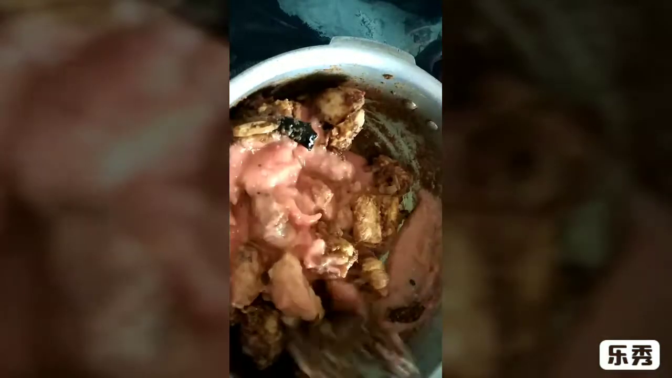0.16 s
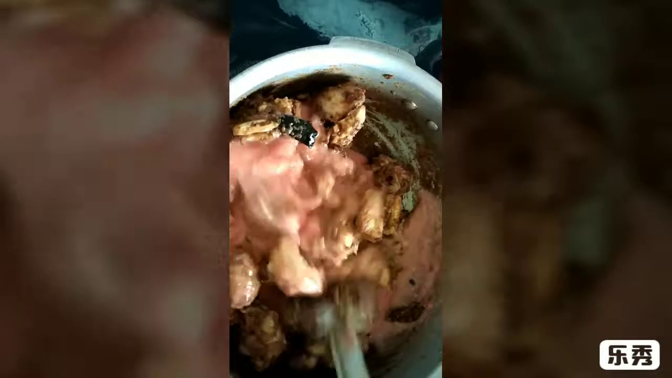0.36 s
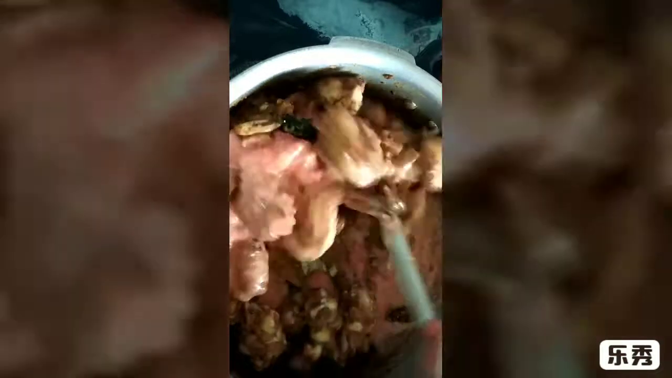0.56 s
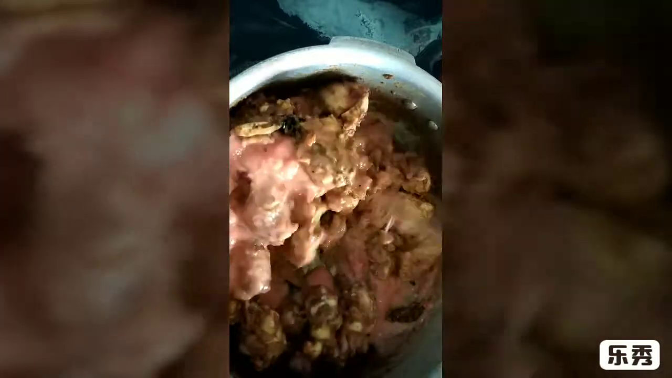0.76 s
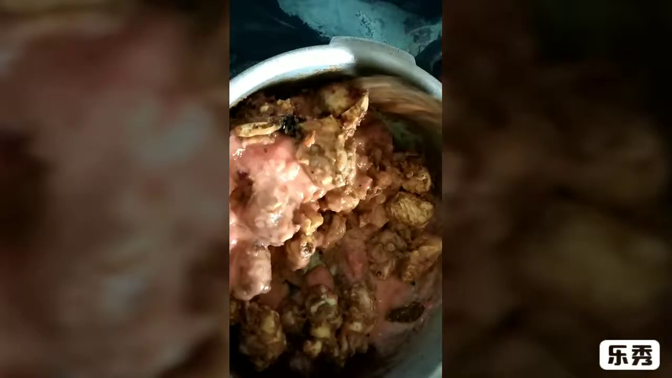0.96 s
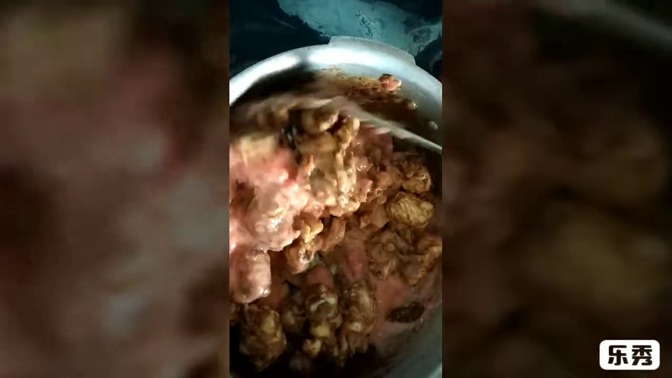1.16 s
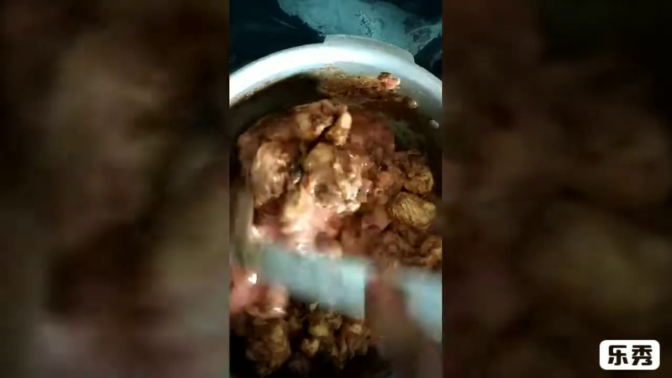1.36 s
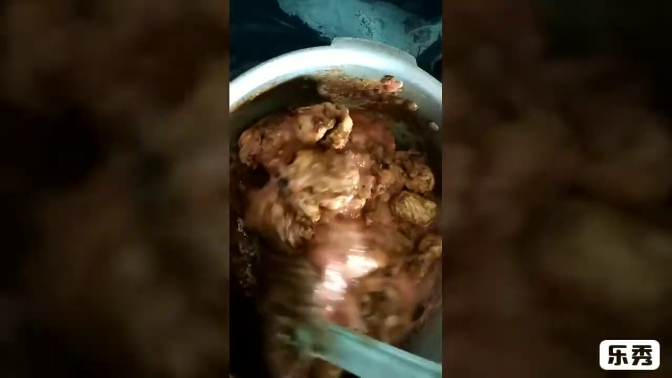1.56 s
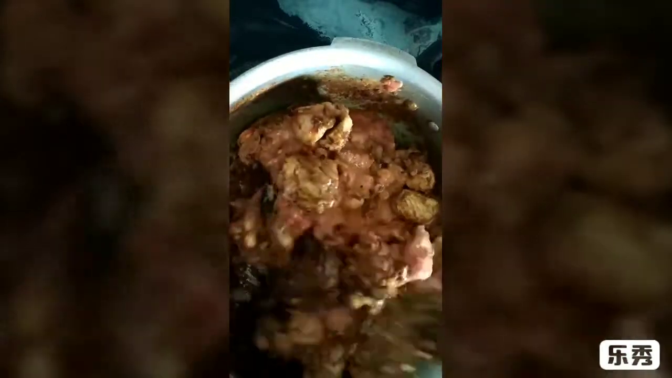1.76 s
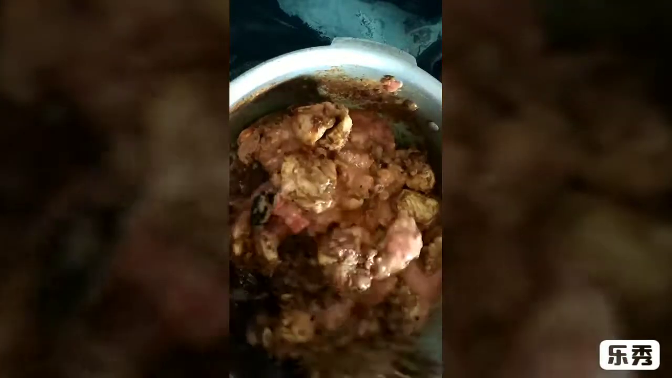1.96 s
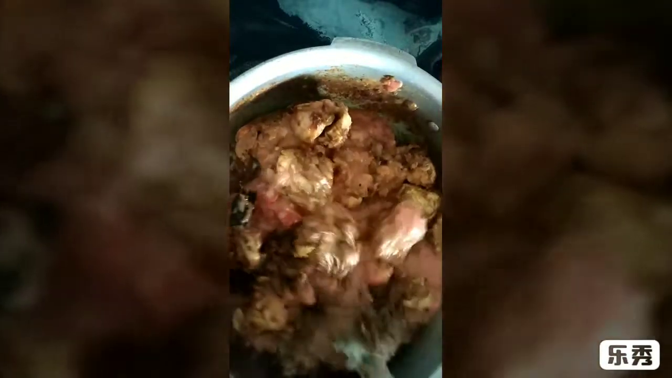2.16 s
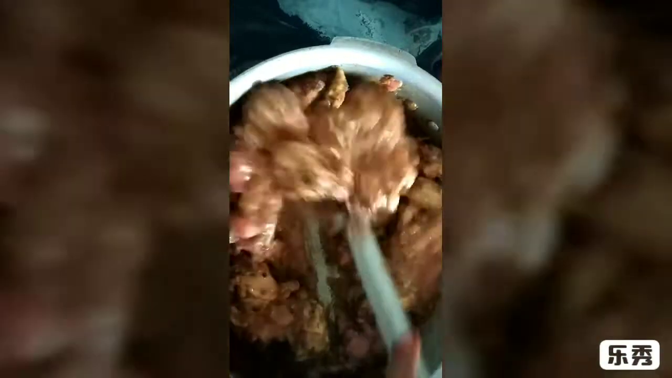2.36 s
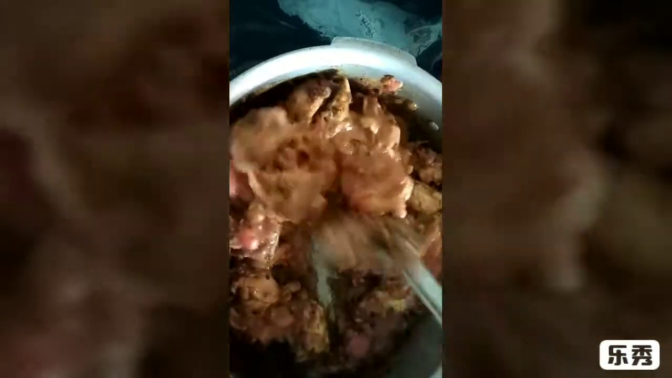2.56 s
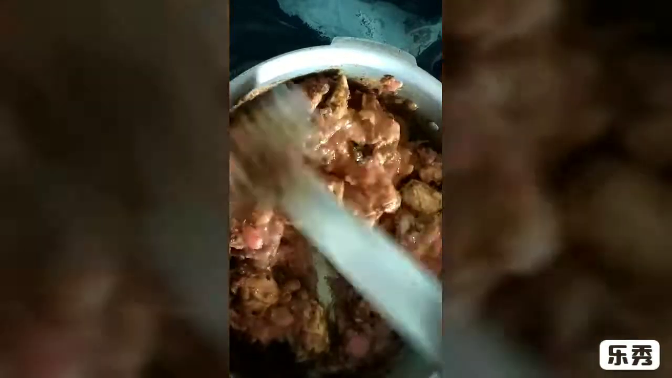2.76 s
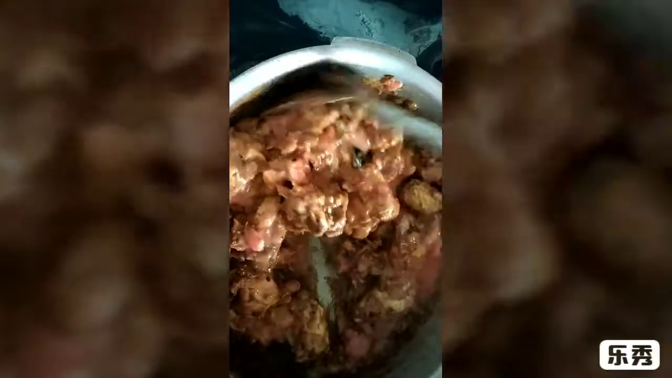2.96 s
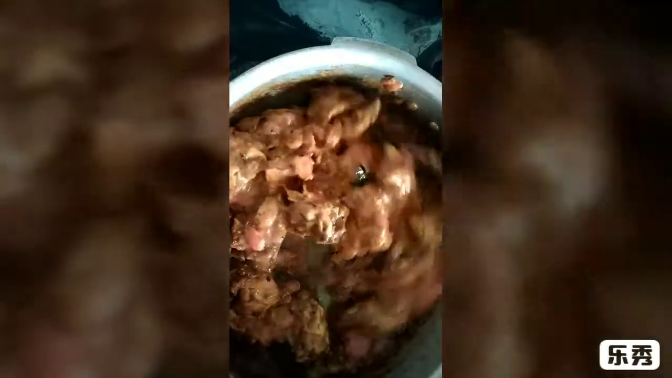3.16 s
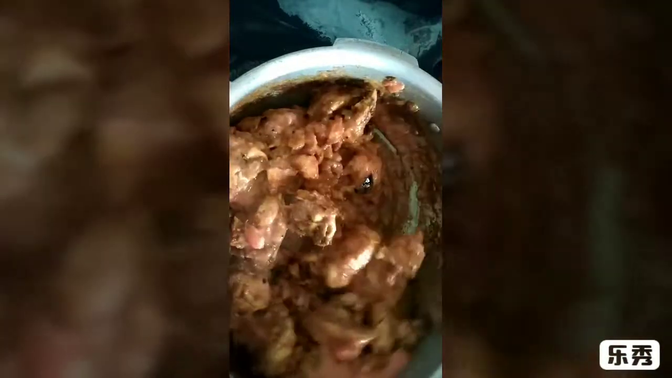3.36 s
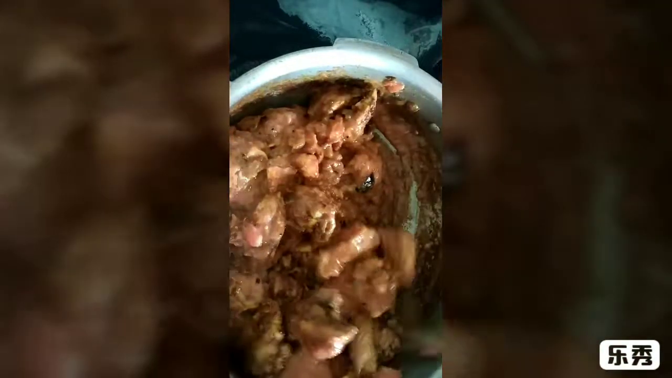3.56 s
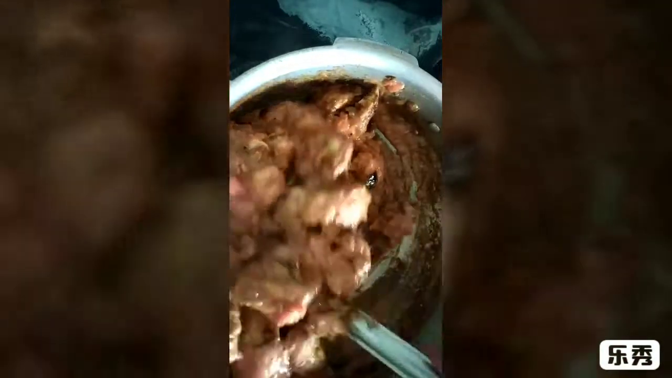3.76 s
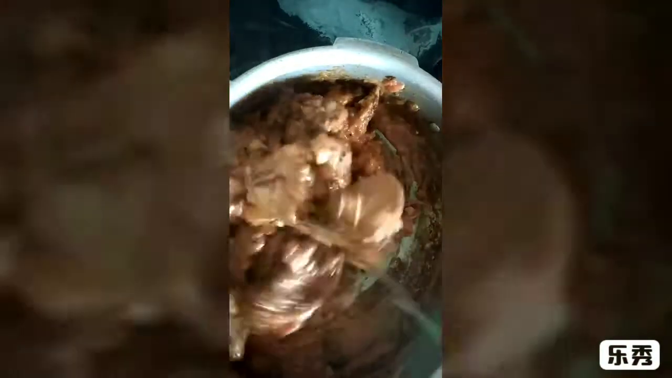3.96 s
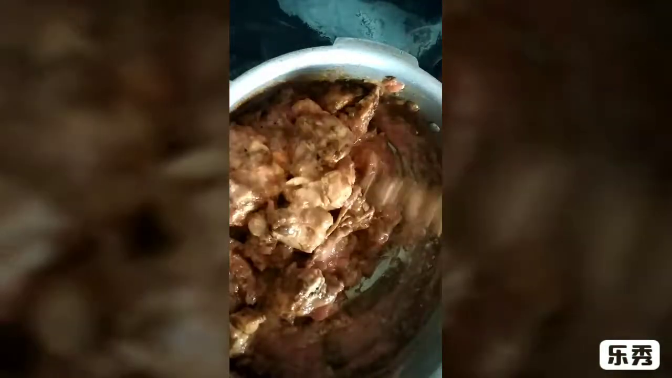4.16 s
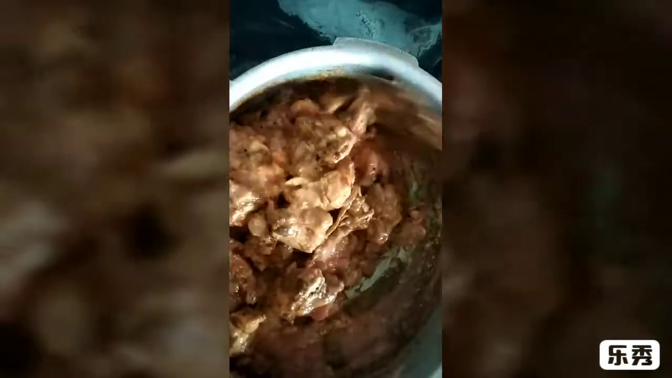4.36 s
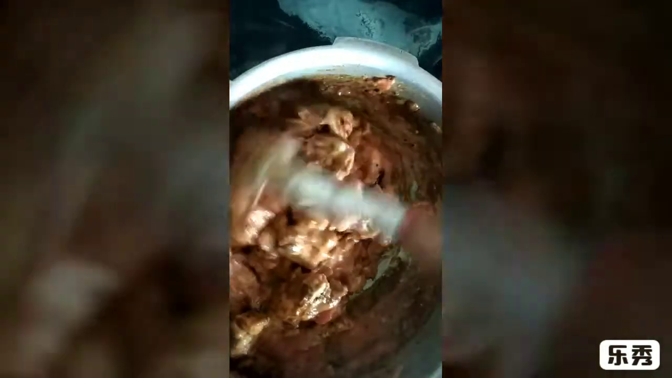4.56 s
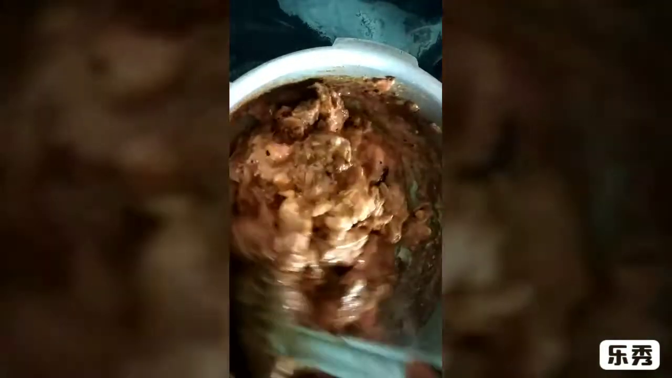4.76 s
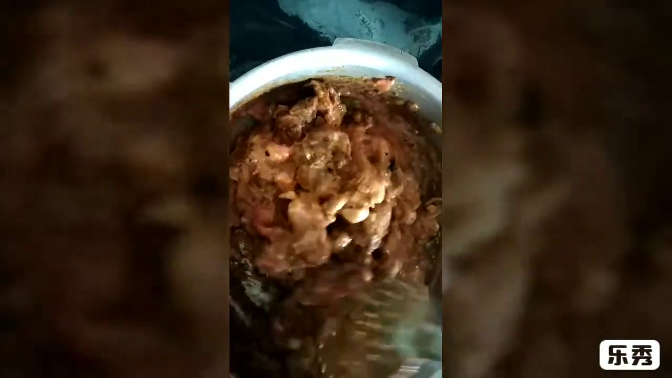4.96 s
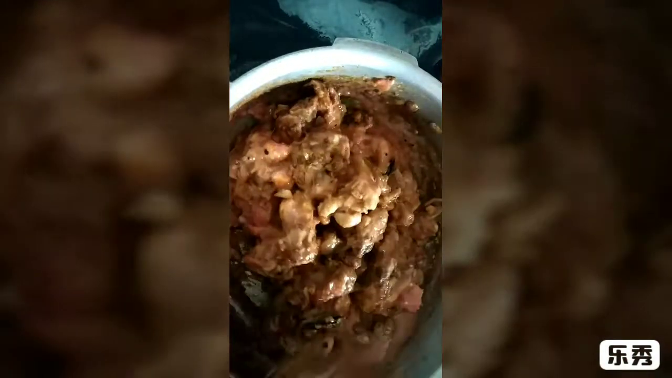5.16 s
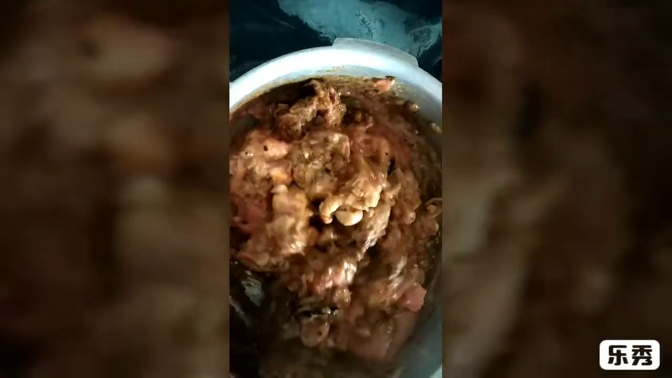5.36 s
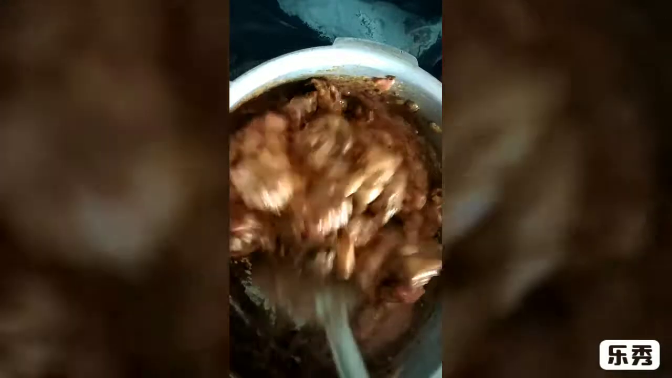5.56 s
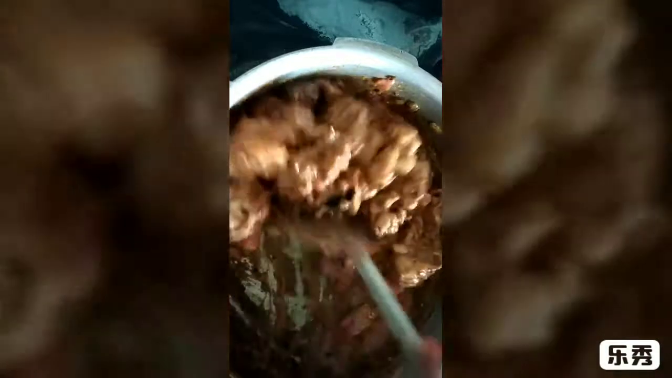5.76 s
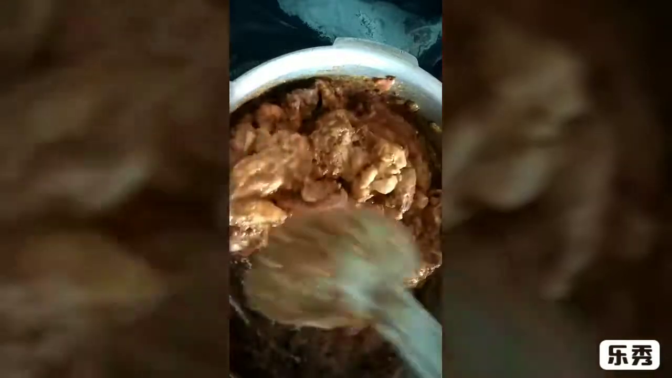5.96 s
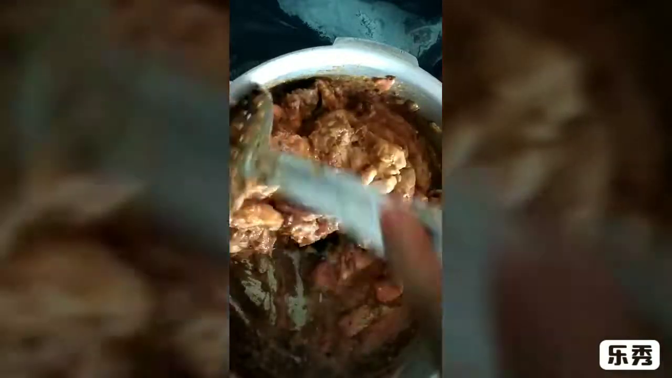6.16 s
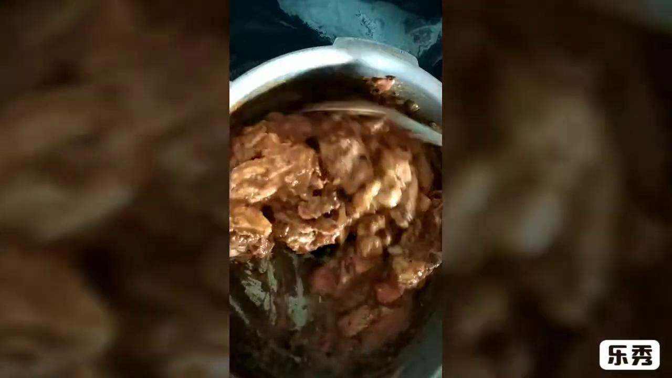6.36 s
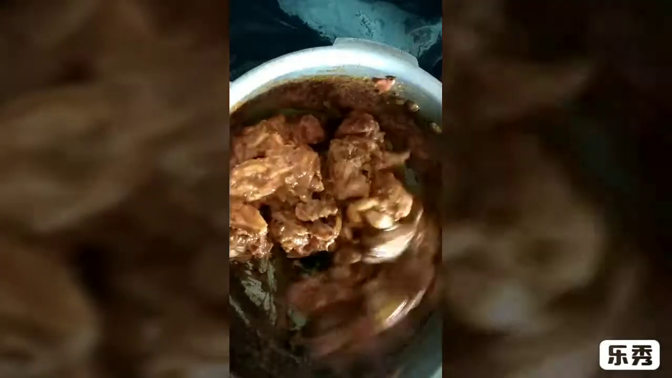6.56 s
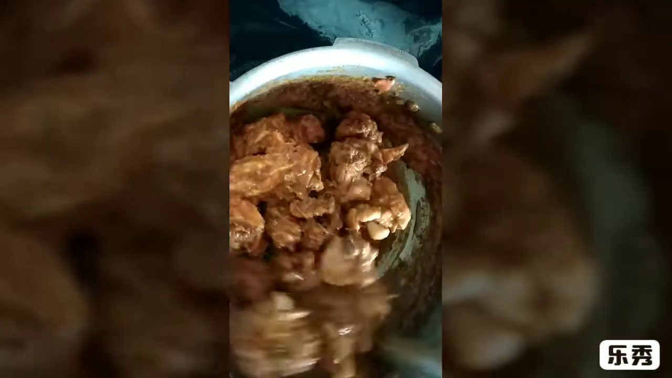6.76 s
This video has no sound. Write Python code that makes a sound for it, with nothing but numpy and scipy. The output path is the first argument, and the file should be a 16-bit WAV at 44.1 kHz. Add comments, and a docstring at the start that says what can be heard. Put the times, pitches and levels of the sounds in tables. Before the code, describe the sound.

A metal ladle stirs meat and thick gravy in a metal cooker, close to a phone microphone in a bare kitchen. Uneven strokes scrape the wall and land short, damped knocks and clinks, sometimes in quick clattering runs, loudest a little before halfway. Gravy squelches, fat spits and lumps rumble over the base as the stirring goes on. A faint steady sizzle and a low appliance hum lie underneath.

```python
"""Knocks and scrapes of a metal ladle, close up, in a metal cooker full of thick gravy and meat.
The food damps the pot, so each blow is short; a hard, bare kitchen rings on after it.
Between blows the ladle sticks and slips along the wall, lumps rumble over the base, gravy
squelches and fat spits. Behind it an appliance hums and a steady sizzle fills the treble.
A phone's microphones pick it up, with thin bass, a noise suppressor and a limiter."""
import sys
import numpy as np
from scipy import signal
from scipy.fft import rfft, irfft, next_fast_len
from scipy.io import wavfile
from scipy.ndimage import uniform_filter1d, minimum_filter1d, map_coordinates

SR = 44100
rng = np.random.default_rng(int(sys.argv[2]) if len(sys.argv) > 2 else 0)


def wav_out(sig):
    """Save sig, one row per channel (or a flat mono array), as 16-bit PCM at SR to the path in sys.argv[1]."""
    wavfile.write(sys.argv[1], SR, np.round(np.clip(np.atleast_2d(sig).T, -1, 1) * 32767).astype(np.int16))


N = 300762

# Ladle strokes along the wall, levels relative: start_s, swell_s, hold_s, scrape_db, bright_db, rasp_db
WALL_STROKES = [(0.42, 0.0078, 0.029, -33, -7, -44), (0.482, 0.084, 0.03, -23.5, -3.5, -28.5),
                (1.07, 0.079, 0.24, -41.5, -2.5, -43), (1.41, 0.0065, 0.025, -48, 4, -35.5),
                (1.6, 0.019, 0.1, -27, 0.5, -29.5), (2.171, .015, 0.019, -49, 16.5, -42),
                (2.28, 0.017, 0.067, -26.5, -5, -38.5), (2.308, 0.091, 0.028, -26, 3.5, -27.5),
                (2.964, 0.021, 0.0029, -35, -10, -42), (3.078, 0.08, 0.0061, -39.5, 1.5, -35),
                (3.209, 0.052, 0.0053, -28.5, -3.5, -32.5), (3.3, 0.062, 0.16, -31.5, -2.5, -33.5),
                (3.641, 0.027, 0.043, -33, -2.5, -32), (3.733, 0.022, 0.12, -44.5, -3, -43),
                (4.02, 0.053, 0.0051, -37.5, -1.5, -37.5), (4.137, 0.039, 0.01, -46, 2, -38.5),
                (4.223, 0.011, 0.048, -52, 4.5, -59), (4.365, 0.012, 0.033, -51, 1, -55),
                (4.46, 0.032, 0.0093, -33.5, -57, -38), (4.497, 0.029, 0.31, -42, 1.5, -37.5),
                (4.622, 0.14, 0.018, -29.5, -3.5, -47), (4.888, 0.031, 0.0094, -40, 9, -26),
                (4.907, 0.01, 0.11, -35, 8, -43), (5.383, 0.014, 0.1, -37.5, 3, -38),
                (5.446, 0.18, 0.2, -32, 1.5, -33), (5.578, 0.11, 0.041, -27, -8, -41),
                (5.897, 0.0043, 0.0081, -45.5, 8.5, -47), (6.27, 0.039, 0.013, -33.5, -9, -38),
                (6.315, 0.054, 0.19, -38.5, 0.5, -37.5), (6.595, 0.029, 0.011, -28, 2, -31.5),
                (6.64, 0.046, 0.043, -26.5, -15, -38), (6.681, 0.068, .1, -28, 0, -25.5)]
# Resonances of the pot's wall and base: pitch_hz, width_hz, level_db
WALL_LOW_MODES = [(610, 240, -3), (896, 216, 2), (1168, 126, 1.5), (1422, 156, 0.5)]
WALL_HIGH_MODES = [(1570, 200, 4.5), (2117, 714, 1.5), (2870, 800, 1), (3535, 770, -3.5)]
BASE_MODES = [(270, 15.5, 1), (312.3, 19.5, 2.5), (381.7, 18, -0.5), (448, 15.7, -1.5), (558.6, 28, -2.5)]
# Tone of metal on metal, for rasp and clink: freq_hz, level_db
METAL_SPECTRUM = [(700, -22), (2060, -14), (3500, -11), (4030, -5), (5190, -1), (7600, -3.5), (11900, -10),
                  (16000, -18.5)]


def ladle_blows():
    """Each blow is a damped knock that rings wall and base and clinks. Returns direct sound, room send."""
    # Ladle hits, levels relative; the room send is low where food covers the contact:
    # start_s, level_db, pitch_hz, thud_db, high_modes_db, clink_db, clink_tilt_db_per_octave, room_db
    hits = [(0.292, -32, 650, 4, -23, -6, -1, -2), (0.433, -7, 599, -5.5, -15, -18, 0, -9),
            (0.598, -9, 910, -8, 1.5, -7, -10, -18), (0.6092, -7.5, 1010, -10, 2, -15, -15, -7),
            (0.6251, -12.5, 1170, -21, -1, -38, 0, 1), (0.662, -9, 950, -30, -11, -22, 0, -10),
            (0.6695, -12, 1020, -30, -16, -22, 0, -15), (0.6753, -10.5, 1150, -36, -11, -16, 0, -7),
            (1.124, -28.5, 1190, 3.5, -10, -4, -2, -10), (1.1771, -17.5, 1300, -3, -10, -5.5, -13, -4),
            (1.4354, -18, 1300, -4, 5, 2.5, -8, -3.5), (1.616, -12.5, 654, -6.5, -0.5, 8.5, 5, 1),
            (2.135, -31.5, 1880, -16, 2, -9, -2, -11), (2.291, -13, 920, -6, 7, -1, -19, -5.5),
            (2.428, -7.5, 1080, -40.5, -18, -32, 0, 1), (2.435, -8, 1810, -37, -6, -24, 0, 0),
            (2.439, -13.5, 1030, -21, 0, -24, -2, -2), (2.456, -4.5, 1060, -43, -8, -25, -2, -9.5),
            (2.469, 0, 1085, -42, -18, -28, 1.5, -9), (2.503, -8.5, 1040, -26.5, -7, -6, -4, -6),
            (2.52, -6.5, 1360, -14, -2, -13, -3, -5), (2.977, -17, 706, -14, -10, -30, 1, -10),
            (3.172, -23.5, 1770, -8, -8, -10.5, -7, 1), (3.292, -14.5, 1250, -13, -28, -30, 2, -1.5),
            (3.35, -13, 1110, -39, -1.5, -26, -2, -3.5), (3.387, -19, 930, -27, -19, -20, -5, 3),
            (3.441, -29.5, 905, -34, -24, 12.5, -11, -2), (3.828, -18.5, 970, -6, -27, -25, 0, -7),
            (4.074, -26.5, 675, -12, -25, 4, 9, -9), (4.2044, -22.5, 1390, -36, -4, 13.5, 10, -12),
            (4.249, -28.5, 1030, -31, -8, -21, -1, -38), (4.66, -24, 730, -18, 2, 11.5, -1, 1.5),
            (4.735, -15, 1270, -34, -4, -28, 1, -7), (4.919, -16.5, 1400, -13, -1, -6, 1, -17),
            (4.9672, -8, 1290, -51, 1.5, 2, -13, -11.5), (5.395, -22, 905, -31, -3, 16.5, -7, -2.5),
            (5.607, -15, 1610, -28, -8, -17, 6, 3), (5.731, -13, 1470, -50, -6, -22, 0, -1),
            (5.738, -13.5, 1480, -42, 7, -18, -2.5, -8), (5.76, -5, 1400, -38, -5, -5.5, -8, -8),
            (5.809, -11.5, 1400, -38, -5, -18, -2, -6), (6.311, -22, 1340, -4, -17, -22, 2, -19),
            (6.632, -28.5, 630, -8, 8.5, -13, -4, 1), (6.69, -15.5, 1010, -16, -21, -15, 0, -1),
            (6.754, -17, 1050, -33, -25.5, -8, -6, -0.5)]
    clink_pivot_hz, jolt_rise_s = 6600, 0.0044
    direct, send = np.zeros((2, N + SR)), np.zeros(N + SR)
    t = np.arange(2048) / SR
    peak = lambda x: x / np.abs(x).max()
    for start_s, db, hz, thud_db, high_db, clink_db, tilt_db, room_db in hits:
        lag = round(5 * np.tanh(rng.standard_normal()))  # one microphone hears the contact first
        pan_db = 2 * np.tanh(rng.standard_normal())
        crack = rng.standard_normal(len(t)) * amp(-60 * t / 0.031) * (1 - np.exp(-t / 0.00051))
        push = filtered(crack, lambda f: (1 + 1j * f / (1.08 * hz)) ** -2)  # cushioned by the food
        snap = crack * amp(-60 * t / 0.037)  # bare metal contact
        cycles = 14 * (1000 / hz) ** 0.47  # higher contacts are drier
        envelope = amp(-60 * t * hz / cycles) * (1 - np.exp(-t * hz / 0.43))
        knock = peak(np.sin(2 * np.pi * hz * t) * envelope)
        wall = 0.34 * peak(filtered(push, modes(WALL_LOW_MODES, damping=2.0)))
        ring = amp(high_db) * peak(filtered(snap, modes(WALL_HIGH_MODES, damping=1.27)))
        thud = amp(thud_db) * peak(filtered(push, modes(BASE_MODES, damping=5.8)))
        tilt = lambda f: amp(tilt_db * np.log2(np.maximum(f / clink_pivot_hz, .7)))
        clink_tone = lambda f: amp(along(METAL_SPECTRUM, f)) * tilt(f) * (1 + 1j * f / clink_pivot_hz)
        clink = amp(clink_db) * peak(filtered(snap, clink_tone))
        blow = amp(db) * (knock + wall + thud + ring + clink)
        # a hard clink also shoves the whole pot
        jolt = amp(db + clink_db - 18.5) * t / jolt_rise_s * np.exp(1 - t / jolt_rise_s)
        close = amp(-3.5) * blow + jolt
        at = round(start_s * SR)
        direct[0, at + lag:][:len(t)] += close * amp(pan_db / 2)
        direct[1, at:][:len(t)] += close * amp(-pan_db / 2)
        send[at:][:len(t)] += blow * amp(room_db)
    return direct[:, :N], send[:N]


def wall_scrape():
    """Stick-slip grains ring the wall; gravy squelches as it lets go of ladle and meat."""
    rustle_db = np.interp(np.arange(N) / SR, (2.45, 4.6), (-48.5, -56.5))  # faint bed between strokes
    low_rows = [(*timing, db) for *timing, db, _, _ in WALL_STROKES]
    high_rows = [(*timing, db + bright_db) for *timing, db, bright_db, _ in WALL_STROKES]
    low = swells(low_rows, t60_s=0.73, rest_db=rustle_db)
    high = swells(high_rows, t60_s=0.73, rest_db=rustle_db + 2)
    slips = grit(110, depth_db=3.3, patchy_db=3.6) * amp(1.44 * wobble(22))  # catching and letting go
    body = unit(filtered(slips, modes(WALL_LOW_MODES)))
    sheen = unit(filtered(slips, modes(WALL_HIGH_MODES)))
    squelch = amp(-7) * pops(count=1100, centre_hz=1134, cycles=16.7)
    return low * (body + squelch) + high * sheen


def edge_rasp():
    """The ladle's edge rasps on the metal, with fat spitting over each stroke."""
    rows = [(*timing, db) for *timing, _, _, db in WALL_STROKES]
    rasp = coloured(grit(120, depth_db=1.2, patchy_db=3.4), METAL_SPECTRUM)
    spits = amp(-16) * pops(count=900, centre_hz=7600, cycles=19)
    return swells(rows, t60_s=0.72, rest_db=-48) * (rasp + spits)


def food_rumble():
    """Dragged lumps ring the base; air pockets burst in the gravy with a glug."""
    # Drags over the base, levels relative: start_s, swell_s, hold_s, rumble_db, upper_modes_db
    drags = [(0.44, .012, 0.1, -35.5, -24), (1.058, 0.07, 0.082, -43.5, 4),
             (1.609, 0.0085, 0.06, -25.5, 3.5), (2.278, 0.037, 0.05, -32.5, -2),
             (2.95, 0.035, 0.14, -41, -28), (3.096, 0.027, 0.067, -45.5, 9), (3.199, 0.045, 0.11, -37.5, 7),
             (3.451, 0.015, 0.04, -35, 9), (3.52, .02, 0.048, -37.5, -4), (3.642, 0.034, 0.066, -36.5, -3),
             (4.453, 0.074, 0.07, -41.5, 6), (4.692, 0.048, 0.067, -27.5, 1.2),
             (5.382, 0.094, 0.04, -27, -9), (5.777, 0.029, 0.0074, -33.5, -0.5),
             (6.267, 0.036, 0.029, -37.5, 2), (6.466, 0.032, 0.037, -29.5, -2.5),
             (6.579, 0.046, 0.0098, -27.5, 0), (6.702, 0.072, .1, -35, 6.5)]
    deep = swells([(*timing, db) for *timing, db, _ in drags], t60_s=0.85, rest_db=-57)
    upper = swells([(*timing, db + lift) for *timing, db, lift in drags], t60_s=0.85, rest_db=-57)
    lumps = filtered(grit(40, depth_db=1.2, patchy_db=1.2), lambda hz: (1 + 1j * hz / 700) ** -2)
    deep_ring = unit(filtered(lumps, modes(BASE_MODES[:2])))
    upper_ring = unit(filtered(lumps, modes(BASE_MODES[2:])))
    glugs = amp(-6.5) * pops(count=300, centre_hz=516, cycles=16.7)
    return deep * deep_ring + upper * (upper_ring + glugs)


def kitchen_reverb(send):
    """Bare walls ring on; the ladle moves, so each quarter second meets a new tail."""
    # Decay time of the room: freq_hz, t60_s
    decay = [(150, 0.82), (400, 0.81), (1000, 0.53), (2800, 0.54), (7000, 0.43), (14000, 0.23)]
    room, step = np.zeros((2, N + 2 * SR)), SR // 4
    for at in range(0, N, step):
        hz, t, noise = signal.stft(rng.standard_normal((2, SR * 3 // 4)), SR, nperseg=256)
        rise = 1 - np.exp(-t / 0.00074)  # the field builds after the first reflections
        fall = amp(-60 * t / along(decay, hz)[:, None])
        tail = signal.istft(noise * rise * fall, SR, nperseg=256)[1][:, :SR]
        wet = signal.fftconvolve(send[None, at:at + step], tail / np.linalg.norm(tail[0]), axes=1)
        room[:, at:at + wet.shape[1]] += wet
    return room[:, :N]


def sizzle():
    """Fine, steady treble grain with a slight flutter."""
    # Tone of the sizzle: freq_hz, level_db
    spectrum = [(1470, -39), (3250, -32), (3950, 5), (4650, 1), (6500, 11), (8300, 12.5), (10100, 10.5),
                (11200, 13), (13300, 10.5), (15500, 2.5), (16000, -18)]
    return coloured(grit(60, depth_db=.8, patchy_db=3.6), spectrum) * amp(.6 * wobble(4))


def kitchen_air():
    """Low, gently wavering room tone."""
    # Tone of the kitchen's air noise: freq_hz, level_db
    spectrum = [(25, -20), (90, -7.5), (190, 0.5), (300, -2), (400, 2), (550, -52), (1000, -18.5),
                (2500, -23.5), (3500, -13.5), (5000, -47)]
    return coloured(grit(9.8, depth_db=2.8, patchy_db=3), spectrum)


def appliance_hum():
    """Two fuzzy mains harmonics: narrow bands of noise, a touch to the right."""
    # Hum bands: pitch_hz, half_width_hz, level_db
    harmonics = [(201.8, 14.2, -9), (393.5, 2.8, -14)]
    bands = lambda hz: sum(amp(db) / (1 + ((hz - pitch) / width) ** 4) for pitch, width, db in harmonics)
    return unit(filtered(rng.standard_normal(N), bands)) * amp([[-.6], [.6]])


def thin_whine(pitch_hz=3400, half_width_hz=20):
    """A barely audible thread of narrow noise that dies away at the very start."""
    band = lambda hz: 1 / (1 + ((hz - pitch_hz) / half_width_hz) ** 4)
    fade = swells([(1.5, -2, .55, -64.5)], t60_s=0.72, rest_db=-120)  # a negative swell ramps down
    return fade * unit(filtered(rng.standard_normal((2, N)), band))


def swells(rows, t60_s, rest_db):
    """Stroke envelope over a resting level. Rows: start_s, swell_s, hold_s, level_db."""
    full_stroke_s = 0.17  # shorter flicks stop sooner
    t = np.arange(0, N / SR + .01, .001)
    start, swell, hold, db = np.transpose(rows)[:, :, None]
    fade_s = t60_s * np.clip((swell + hold) / full_stroke_s, .1, 1)
    rise = np.clip((t - start) / swell, 0, 1) ** 2.73
    gain = rise * amp(db - 60 * np.maximum(t - start - swell - hold, 0) / fade_s)
    power = np.interp(np.arange(N) / SR, t, np.sum(gain ** 2, axis=0))
    return np.sqrt(power + amp(rest_db) ** 2)


def pops(count, centre_hz, cycles):
    """Short rising pops of scattered pitch, size and pan, each dying over about `cycles` periods."""
    when, pitch, size, side = rng.random((count, 4)).T[:, :, None]
    k = np.arange(1024)
    turns = centre_hz * 2 ** (2.2 * (pitch - .5)) * k / SR
    size_db = -3 * np.log(size + .04)
    chirp = np.sin(2 * np.pi * turns * (1 + 0.036 * np.minimum(turns, cycles)))
    pop = amp(size_db - 60 * turns / cycles) * chirp
    at = ((when * N).astype(int) + k).ravel()
    pair = [np.bincount(at, (pop * share).ravel(), N + len(k))[:N] for share in (side, 1 - side)]
    return unit(np.array(pair))


def grit(rate_hz, depth_db, patchy_db):
    """Two noises in uneven grains, with narrow spectral patches of random gain."""
    cells = signal.stft(rng.standard_normal((2, N)), nperseg=1024)[2]
    patches = uniform_filter1d(rng.standard_normal(cells.shape), size=3, axis=1)
    patches = uniform_filter1d(patches, size=4, axis=2)
    noise = signal.istft(cells * amp(patchy_db * unit(patches)), nperseg=1024)[1][:, :N]
    return noise * amp(depth_db * wobble(rate_hz))


def stereo_spread(pair):
    """Blend two signals to be as alike as the two microphones hear them."""
    # Left-right likeness of diffuse sound: freq_hz, correlation
    likeness = [(60, 0.24), (180, 0.87), (550, 0.72), (1650, -0.039), (4970, -0.084), (15000, 0.0059)]
    angle = lambda hz: np.arccos(np.clip(along(likeness, hz), -1, 1)) / 2
    mid, side = filtered(pair, lambda hz: np.array([np.cos(angle(hz)), np.sin(angle(hz))]))
    return np.array([mid + side, mid - side])


def modes(table, damping=1):
    """Causal response of resonances in alternating polarity, widened by damping."""
    return lambda f: sum(
        (-1) ** k * amp(db) * 1j * f * width * damping / (hz * hz - f * f + 1j * f * width * damping)
        for k, (hz, width, db) in enumerate(table))


def filtered(x, response):
    """x through a complex frequency response."""
    size = next_fast_len(x.shape[-1] + 8192)
    return irfft(rfft(x, size) * response(np.fft.rfftfreq(size, 1 / SR)), size)[..., :x.shape[-1]]


def coloured(x, spectrum):
    """x through an EQ curve, at rms 1."""
    return unit(filtered(x, lambda hz: amp(along(spectrum, hz))))


def wobble(rate_hz):
    """A smooth random curve."""
    return map_coordinates(rng.standard_normal(int(N * rate_hz / SR) + 4), [np.arange(N) * rate_hz / SR])


def along(points, hz):
    """Read (freq_hz, value) points on a log axis."""
    freqs, values = np.transpose(points)
    return np.interp(np.log(hz + 1), np.log(freqs + 1), values)


def amp(db):
    """Gain of a level in dB."""
    return 10 ** (np.asarray(db) / 20)


def unit(x):
    """x at rms 1."""
    return x / np.sqrt(np.mean(x ** 2) + 1e-20)


def scene():
    """Ladle and pot in the kitchen, over sizzle and hum."""
    blows, send = ladle_blows()
    stirring = amp(-3.5) * wall_scrape() + amp(-3) * edge_rasp() + amp(-2.5) * food_rumble()
    room = kitchen_reverb(send + amp(-7) * stirring[0])
    background = amp(-41.5) * sizzle() + amp(-44) * kitchen_air() + thin_whine()
    return blows + stereo_spread(stirring + room + background) + amp(-45.5) * appliance_hum()


def record(dry):
    """The phone: bass cut, left-right balance, noise suppressor, peak limiter and treble cutoff."""
    # Microphone response: freq_hz, gain_db
    bass_cut = [(20, -36), (60, -26.5), (120, -15.5), (200, -2), (16000, 4.5)]
    # Left microphone over right: freq_hz, balance_db
    balance = [(60, 0), (380, -0.5), (2380, -1), (15000, 0)]
    # Suppressor threshold, under which sound is turned down: freq_hz, level_db
    threshold = [(350, -110), (600, -66), (1500, -66.5), (3000, -67), (3700, -68), (7000, -110)]
    ceiling, cutoff_hz = .88, 15900
    x = filtered(dry, lambda hz: amp(along(bass_cut, hz) + along(balance, hz) * [[.5], [-.5]]))
    hz, _, cells = signal.stft(x, SR, nperseg=1024)
    power = np.mean(np.abs(cells) ** 2, axis=0)
    power = uniform_filter1d(uniform_filter1d(power, size=9, axis=0), size=3, axis=1)
    over = np.abs(power) / amp(along(threshold, hz))[:, None] ** 2
    cells *= amp(-35) + over ** 4 / (1 + over ** 4)
    x = signal.istft(cells, SR, nperseg=1024)[1][:, :N]
    safe_gain = np.minimum(1, ceiling / (np.abs(x).max(axis=0) + 1e-9))
    limiter = uniform_filter1d(minimum_filter1d(safe_gain, size=257), size=129)
    return filtered(x * limiter, lambda hz: hz < cutoff_hz)


dry = scene()
out = record(dry)
wav_out(out)
```